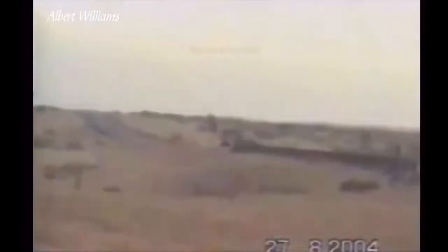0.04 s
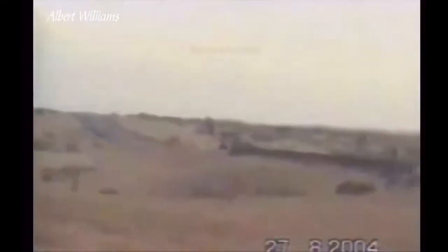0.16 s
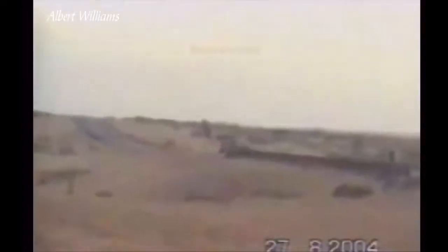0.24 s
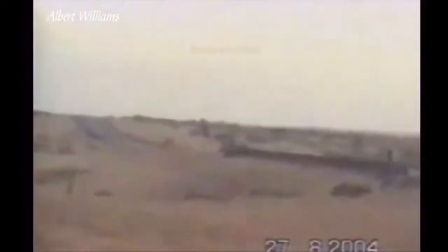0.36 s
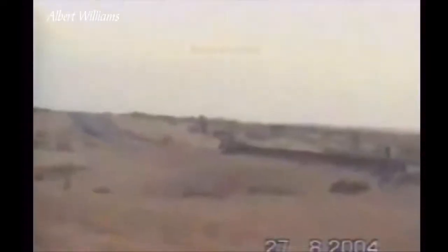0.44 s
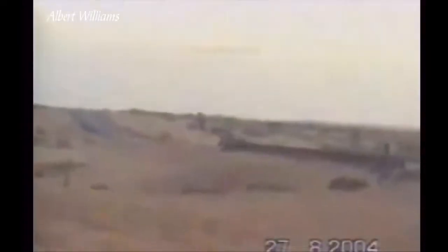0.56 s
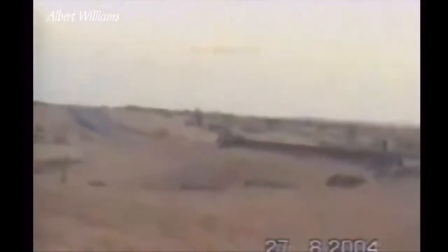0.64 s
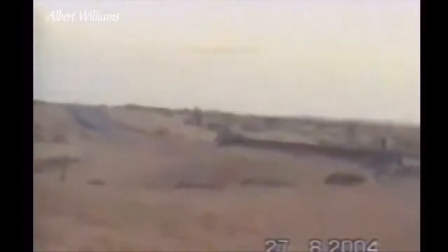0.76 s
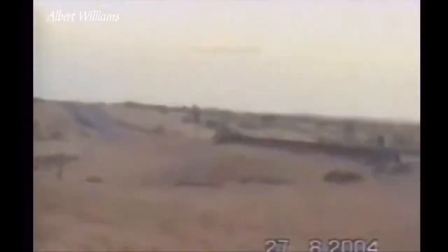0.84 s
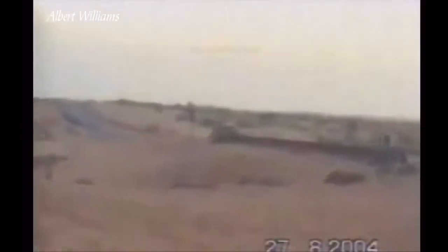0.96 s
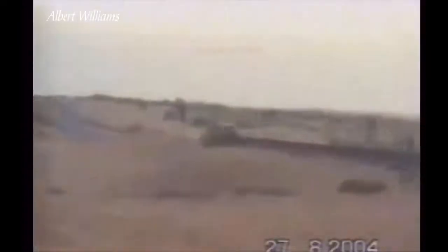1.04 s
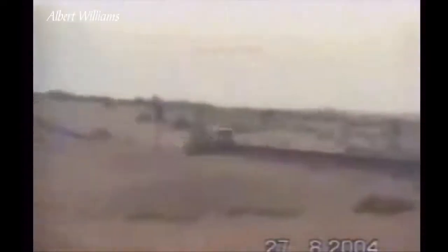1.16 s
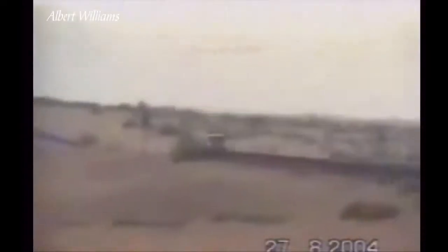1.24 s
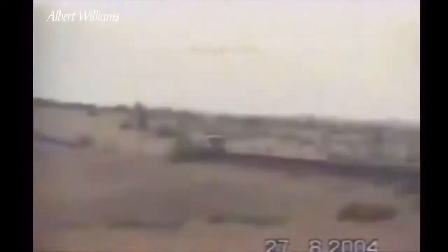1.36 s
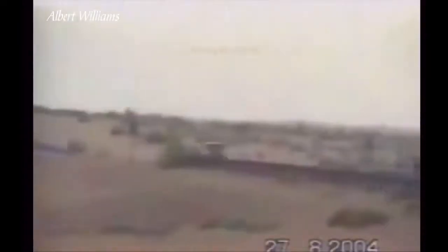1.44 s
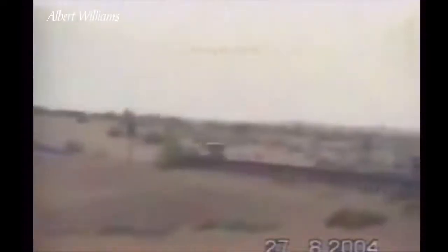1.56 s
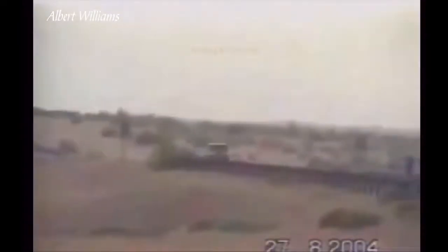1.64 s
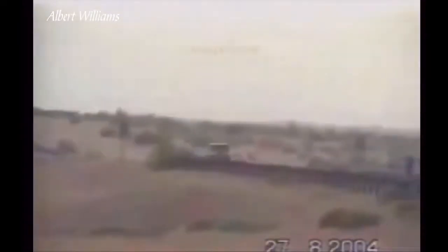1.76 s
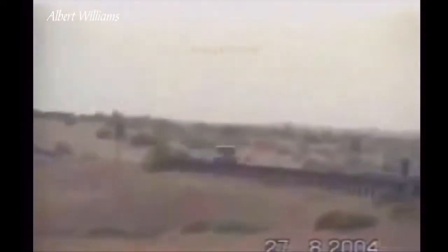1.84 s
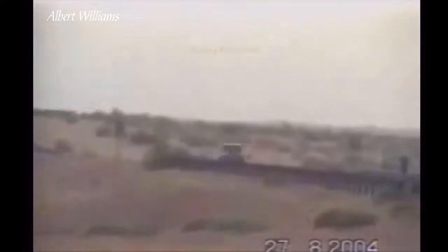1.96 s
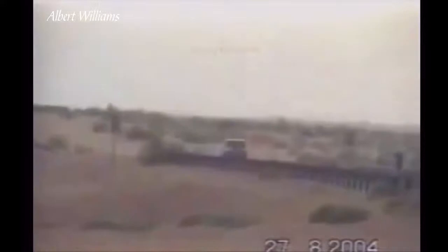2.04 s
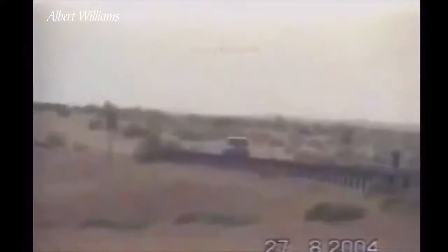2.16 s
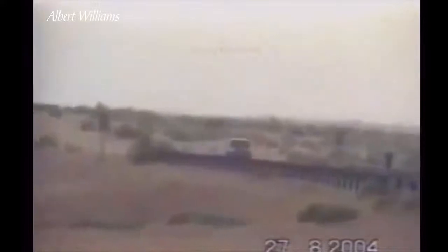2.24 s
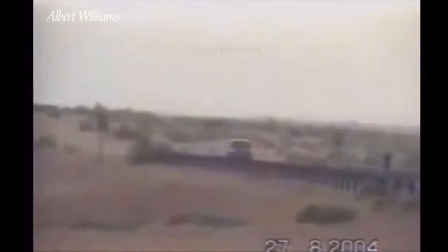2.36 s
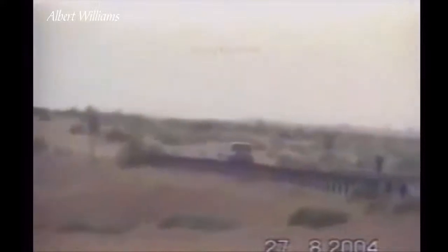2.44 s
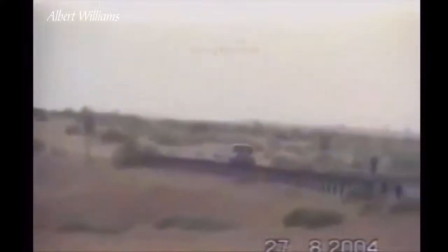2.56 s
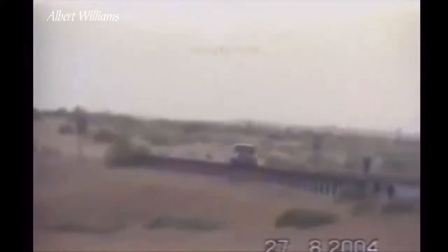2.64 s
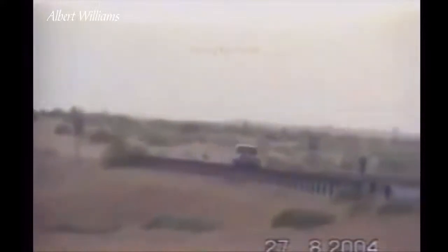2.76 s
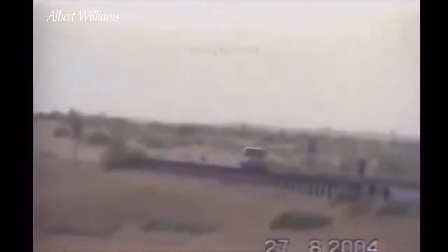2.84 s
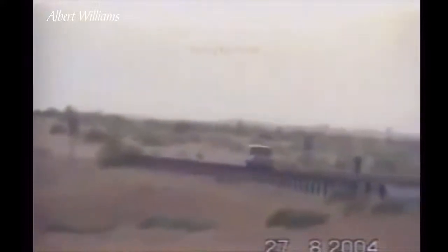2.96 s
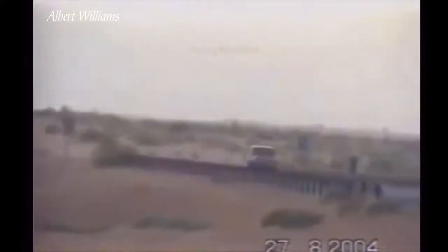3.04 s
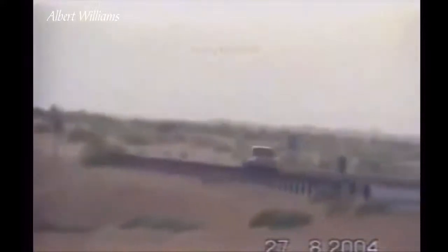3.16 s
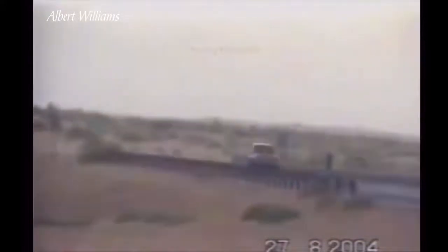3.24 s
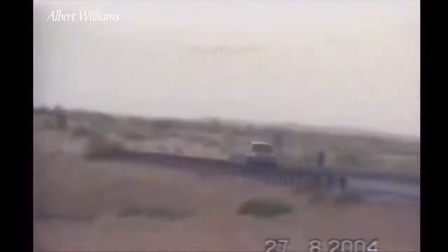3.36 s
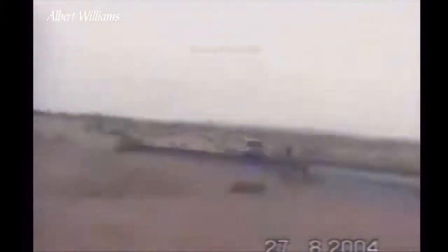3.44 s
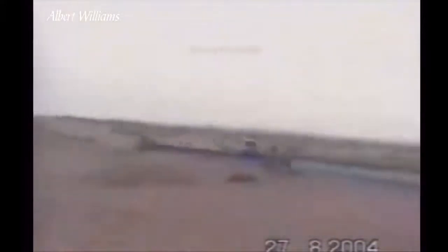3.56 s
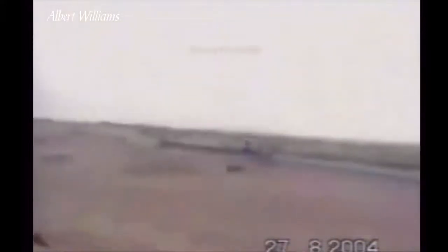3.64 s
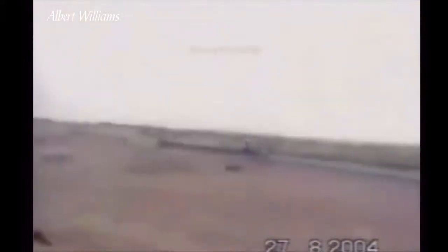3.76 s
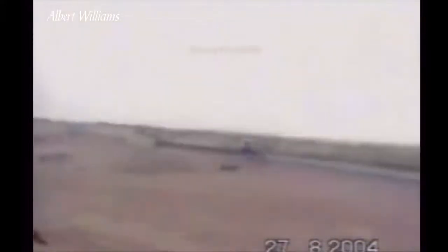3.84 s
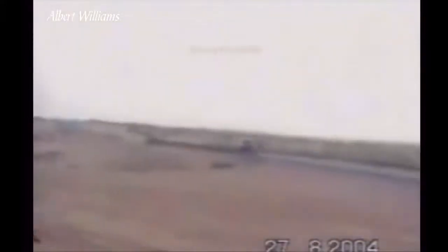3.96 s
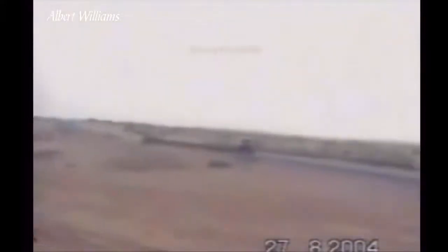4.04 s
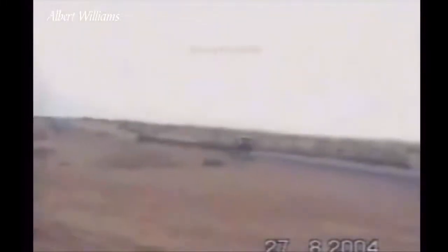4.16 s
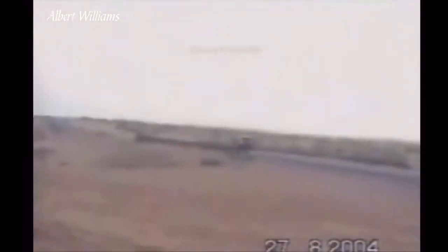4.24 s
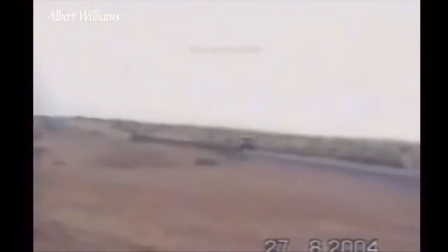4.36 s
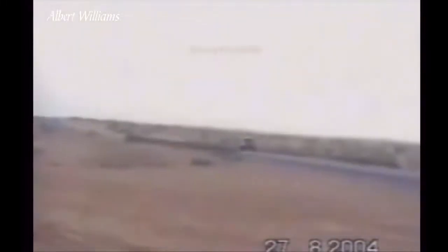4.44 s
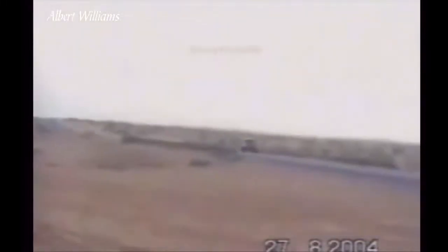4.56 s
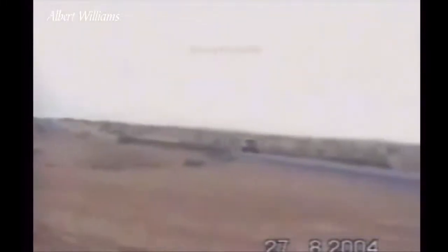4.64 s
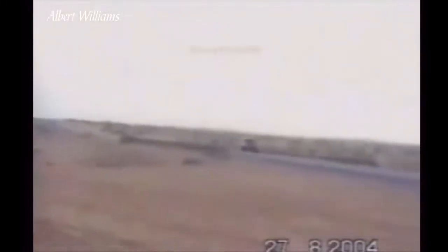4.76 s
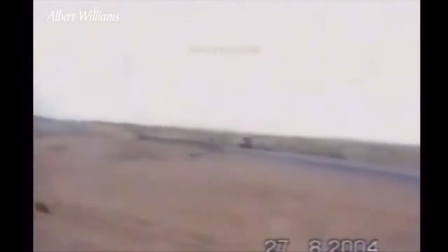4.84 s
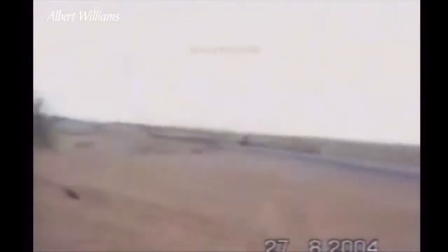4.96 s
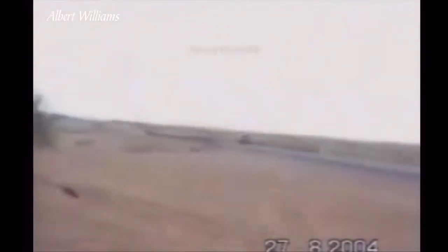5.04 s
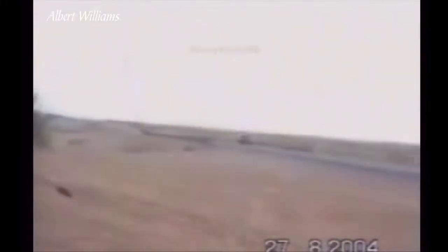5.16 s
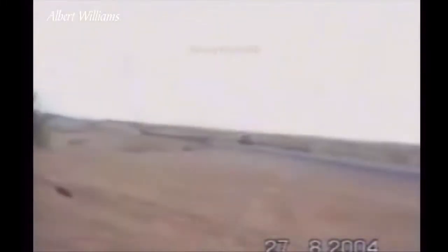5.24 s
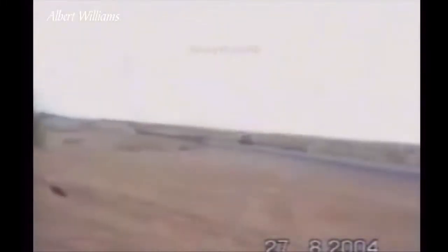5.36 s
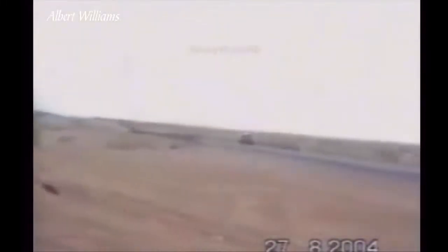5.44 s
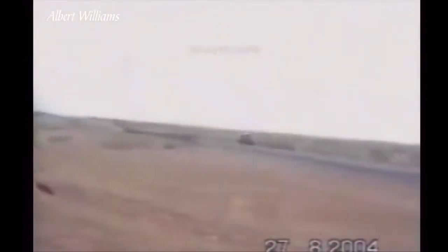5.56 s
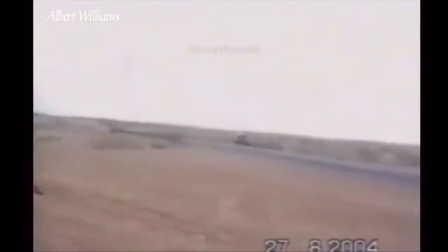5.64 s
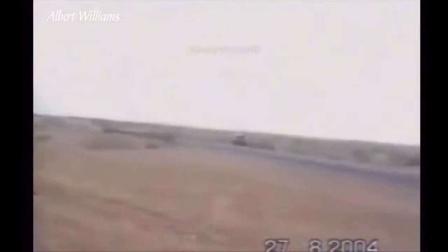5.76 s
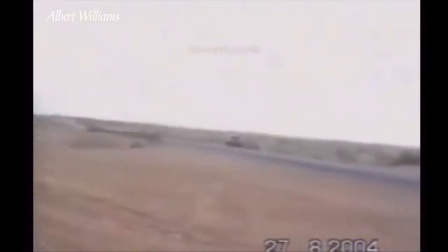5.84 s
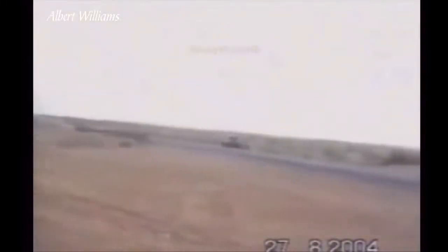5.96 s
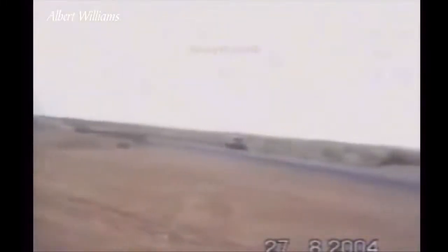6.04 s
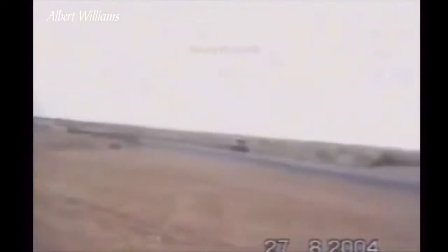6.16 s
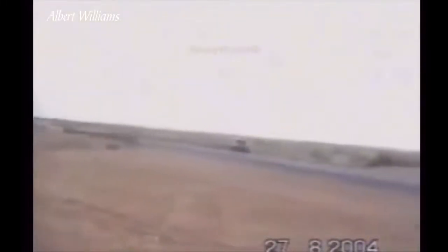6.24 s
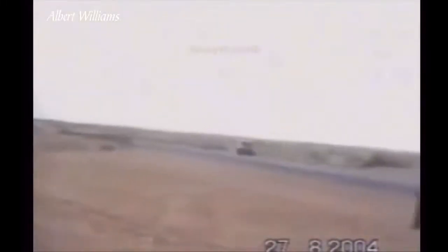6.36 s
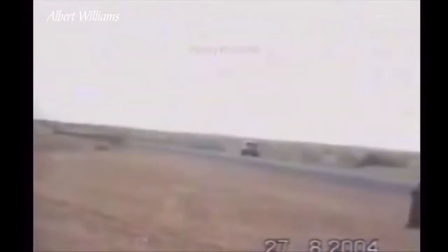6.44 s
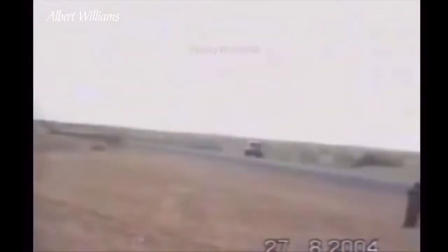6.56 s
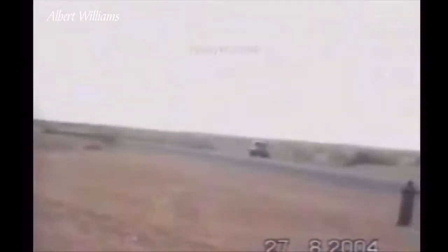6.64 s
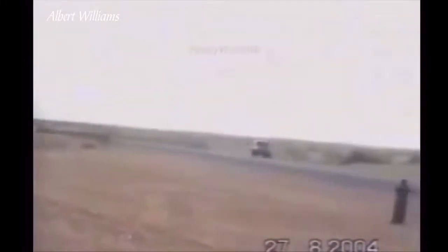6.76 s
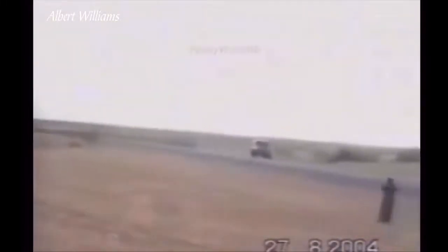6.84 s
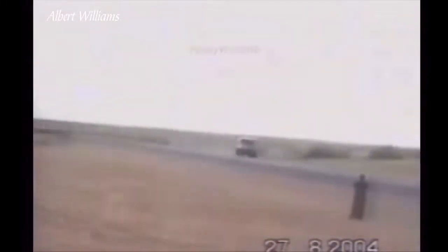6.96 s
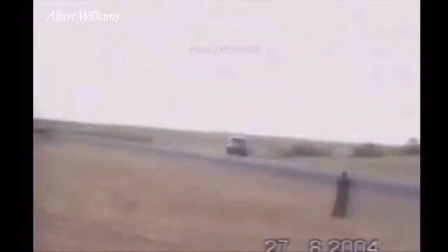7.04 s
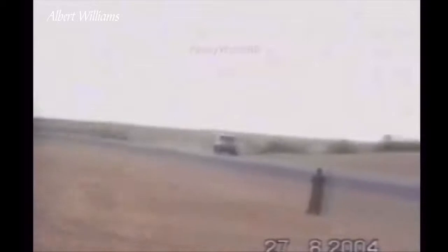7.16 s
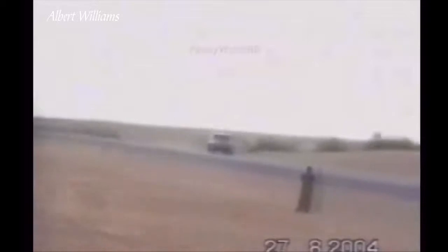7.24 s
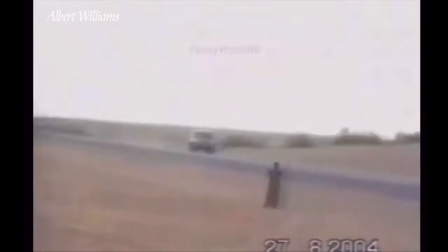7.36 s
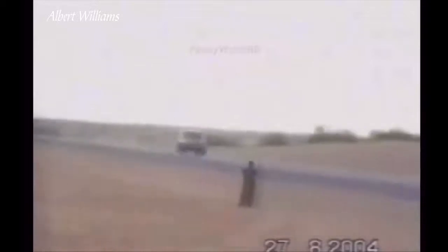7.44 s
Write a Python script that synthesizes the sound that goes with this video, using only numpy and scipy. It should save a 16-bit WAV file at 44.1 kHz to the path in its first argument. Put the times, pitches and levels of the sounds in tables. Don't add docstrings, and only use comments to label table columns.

```python
import sys
import numpy as np
from scipy import signal
from scipy.fft import rfft, irfft, next_fast_len
from scipy.io import wavfile
from scipy.ndimage import uniform_filter1d

SR = 44100
rng = np.random.default_rng(int(sys.argv[2]) if len(sys.argv) > 2 else 0)


def boost(x):
    u = np.asarray(x, float) / 20
    return 10 ** u


def digitize_waveform(pressure):
    field = np.atleast_2d(pressure).T
    bounded = np.clip(field, -1, 1)
    quanta = np.round(bounded * 32767).astype(np.int16)
    wavfile.write(sys.argv[1], SR, quanta)


N = 331191

BANK_HOLD_S, BANK_FADE_DB_PER_S = 0.86, 9


def in_time(rows):
    s, *columns = np.transpose(rows)
    return [np.interp(np.arange(N) / SR, s, c) for c in columns]


def humps(rows, width_s):
    s, *columns = np.transpose(rows)
    bells = np.exp(-((np.arange(N) / SR - s[:, None]) / width_s) ** 2 / 2)
    return [c @ bells for c in columns]


def rms_one(x):
    return x / np.sqrt(np.mean(x ** 2) + 1e-20)


def drift(rate):
    pole = np.exp(-80 * np.pi * rate / SR)
    noise = rng.standard_normal(N // 40 + 2002)
    slow = signal.lfilter([1], [1, -2 * pole, pole * pole], noise)[2000:]
    return np.interp(np.arange(N) / 40, np.arange(len(slow)), rms_one(slow))


def coloured(spectrum, patchy_db, rate, count):
    size = next_fast_len(N)
    log_hz = np.log(np.maximum(np.arange(size // 2 + 1) * SR / size, 1))
    hz, level_db = np.transpose(spectrum)
    at = np.log(hz)
    colour = boost(np.interp(log_hz, at, level_db, left=-200, right=-200))
    noise = rfft(rng.standard_normal(size)) * colour
    place = (log_hz - at[0]) / (at[-1] - at[0]) * (count - 1)
    total = np.zeros(N)
    for k in range(count):
        share = np.clip(1 - abs(place - k), 0, 1)
        total += irfft(noise * share, size)[:N] * boost(patchy_db * drift(rate))
    return rms_one(total)


# t/s, nearness level/dB, open sight of the tyres level/dB; 0 dB = close, full view
CAR_APPROACH = [(0, -19, -9.5), (1.1, -19.5, -13.5), (2.4, -15.5, -13.5), (3.2, -11, -12), (3.7, -7, -11),
                (4.3, -8, -7.5), (4.9, -5.5, -5), (5.4, -4, -2), (5.8, -3, -2.5), (6.2, -3.5, 0),
                (6.5, -4, -2), (6.9, 0.5, 0), (7.2, -1, -2), (7.51, 1.5, -1.5)]


def approach():
    return in_time(CAR_APPROACH)


# f/Hz, level/dB (per Hz)
TAPE_COLOUR = [(2250, -15), (2800, -2.5), (3000, -3), (3400, -5), (4500, -1), (6500, 1), (9000, -0.5),
               (10300, -7.5), (11150, 3.5), (12500, 1)]


def tape_hiss():
    return boost(-78) * coloured(TAPE_COLOUR, patchy_db=1.7, rate=11, count=2)


# t/s, centre f/Hz, level/dB
HIGH_PUFFS = [(5.8, 14700, -93), (6.015, 14750, -90), (6.148, 14750, -90), (6.177, 14100, -92),
              (6.225, 14750, -93), (6.638, 14750, -89), (6.78, 14300, -87), (6.79, 12750, -90),
              (6.874, 14750, -90), (7.08, 14100, -96), (7.1, 14750, -92), (7.354, 14750, -92),
              (7.45, 12750, -94)]


def high_puffs(width_hz=600, puff_s=0.01, lift_db=3):
    out, t = np.zeros(N + 4000), np.arange(-2000, 2000) / SR
    for s, hz, db in HIGH_PUFFS:
        edges = [hz - width_hz / 2, hz + width_hz / 2]
        band_pass = signal.butter(4, edges, "band", fs=SR, output="sos")
        band = rms_one(signal.sosfilt(band_pass, rng.standard_normal(4000)))
        bell = np.exp(-(t / puff_s) ** 2 / 2)
        middle = round(s * SR)
        out[middle - 2000:middle + 2000] += boost(db + lift_db) * bell * band
    return out[:N]


# f/Hz, level/dB (per Hz)
BANK_TREBLE = [(2250, 2), (2400, 3), (2700, -0.5), (2900, -5), (3000, -20)]


def far_bank():
    level_db = -81 - 6 * np.maximum(np.arange(N) / SR - 2.6, 0)
    return boost(level_db) * coloured(BANK_TREBLE, patchy_db=4.0, rate=4.9, count=2)


# f/Hz, level/dB (per Hz)
WIND_COLOUR = [(15, -6.5), (40, -8), (90, -1.5), (200, 2.5), (350, -16), (450, -17)]


def wind(mid_db=-57.5, rise_db_per_s=0.37):
    level_db = mid_db + rise_db_per_s * (np.arange(N) - N / 2) / SR
    return boost(level_db) * coloured(WIND_COLOUR, patchy_db=1.8, rate=3, count=3)


# t/s, peak level/dB, low f/Hz, top f/Hz, t60/s
HAND_KNOCKS = [(.279, -63, 2300, 3800, 0.03), (.281, -49, 900, 2380, 0.018), (.62, -51, 300, 383, 0.24),
               (1.12, -52, 394, 476, 0.15), (1.3, -53, 408, 500, 0.37), (1.394, -48, 1200, 2270, 0.034),
               (1.43, -43.5, 70, 318, 0.16), (1.87, -54, 285, 365, .3), (2.19, -69, 2200, 2940, 0.074),
               (3.294, -61, 1700, 2930, 0.091), (4.756, -51, 1320, 2300, .03),
               (4.8, -50, 1198, 2332, 0.031)]


def knocks():
    out, t = np.zeros(N + 12000), np.arange(12000) / SR
    for s, db, low_hz, top_hz, t60 in HAND_KNOCKS:
        band_pass = signal.butter(3, [low_hz, top_hz], "band", fs=SR, output="sos")
        band = rms_one(signal.sosfilt(band_pass, rng.standard_normal(12000)))
        envelope = boost(db - 60 * t / t60) * (1 - np.exp(-20 * t / t60))
        start = round(s * SR)
        out[start:start + 12000] += envelope * band
    return out[:N]


# t/s, peak level/dB, ring f/Hz, t60/s, snap top f/Hz
BODY_TICKS = [(.067, -35.5, 856, 0.039, 1500), (0.282, -39, 590, 0.048, 2930),
              (1.396, -33, 1720, 0.014, 2200), (1.397, -55, 5740, 0.013, 5770),
              (1.402, -29, 500, 0.007, 1500), (3.289, -34, 1470, 0.014, 1790),
              (4.757, -33, 1490, 0.022, 2000), (4.801, -33, 1680, 0.02, 2300), (4.97, -72, 2810, .04, 1200),
              (5.05, -72, 2870, 0.034, 1200), (6.104, -27.5, 912, 0.022, 2000),
              (6.1045, -34, 327, 0.026, 1000)]


def camera_ticks(rise_s=0.001, snap_db=-49):
    out, t = np.zeros(N + 4000), np.arange(4000) / SR
    for s, db, hz, t60, top_hz in BODY_TICKS:
        dull = signal.butter(10, top_hz, fs=SR, output="sos")
        snap = boost(snap_db) * signal.sosfilt(dull, rng.standard_normal(4000))
        ring = boost(db) * np.sin(2 * np.pi * hz * t)
        envelope = boost(-60 * t / t60) * (1 - np.exp(-t / rise_s))
        start = round(s * SR)
        out[start:start + 4000] += envelope * (ring + snap)
    return out[:N]


# t/s, first cancelled f/Hz, strength (0-1)
SAND_ECHO = [(0, 470, 0.56), (2, 416, 0.4), (4.2, 466.8, 0.61), (5.5, 465, 0.5), (6.4, 441, 0.4),
             (7.51, 431.8, 0.35)]


def ground(x):
    notch_hz, strength = in_time(SAND_ECHO)
    late = np.interp(np.arange(N) - SR / notch_hz / 2, np.arange(N), x)
    return x + np.clip(strength, 0, 1) * late


# t/s, centre f/Hz
HORN_CENTRE = [(0, 772), (.6, 801), (1, 1056), (1.5, 763), (2.5, 752), (3.5, 1050), (4.2, 1013),
               (4.8, 858.4), (5.35, 820.4), (5.7, 1013), (6.15, 937.6), (6.7, 866), (7.51, 836.4)]
# t/s, level/dB
HORN_SWINGS = [
    (2.55, -23),
    (7.1, 3.5),
]


def horn(width_hz=130):
    centre_hz, = in_time(HORN_CENTRE)
    share_db = -4.5 + 0.4 * approach()[0] + humps(HORN_SWINGS, 0.36)[0]
    low = signal.butter(2, width_hz / 2, fs=SR, output="sos")
    a, b = signal.sosfilt(low, rng.standard_normal((2, N)))
    turn = 2 * np.pi * np.cumsum(centre_hz) / SR
    return boost(share_db) * rms_one(a * np.cos(turn) + b * np.sin(turn))


# f/Hz, level/dB (per Hz)
RUMBLE_COLOUR = [(25, -34), (50, -37), (100, -12), (170, -5), (240, 1), (320, -2), (420, -11.5), (520, -23)]
ROAR_COLOUR = [(380, -16), (470, -9), (540, -7), (600, -6.5), (820, -6.5), (1100, -4.5), (1280, -7),
               (1450, -29)]
TREAD_COLOUR = [(1150, -38), (1330, 0), (1560, 3.5), (1730, -2.5), (1850, -8), (2050, -2.5), (2250, -8),
                (2520, -24.5), (2800, -61)]
AIR_COLOUR = [(2500, 2.5), (3000, -1), (3500, 2.5), (4200, -3), (4800, -8), (5200, -7), (6900, -6),
              (7900, -14.5), (8700, -7.5), (9450, -10.5), (9600, -9.5), (10050, -2.5), (11150, 0.5),
              (12500, -4)]
# t/s, rumble level/dB, roar level/dB
ROAD_BUMPS = [(.21, 4, 1.5), (.92, 2, 4.5), (3.49, 3, -3), (4.16, 2, 4), (4.39, 5, 0), (4.7, 4.5, 2.5),
              (4.83, 2.5, 2), (5.46, 3.5, -0.5), (5.63, 1.5, 2.5), (6.04, 3.5, 1.5), (7.04, 4, 0.5),
              (7.43, 0.5, 1.5)]


def road():
    near_db, sight_db = approach()
    jolt_db, slap_db = humps(ROAD_BUMPS, 0.021)
    bank_db, = humps([(BANK_HOLD_S, 6.5)], 1)
    roar_db = -46.5 + 0.31 * near_db + 0.55 * sight_db + bank_db + slap_db
    rumble = boost(-42 + near_db + jolt_db) * coloured(RUMBLE_COLOUR, patchy_db=0.0, rate=4.3, count=6)
    roar = boost(roar_db) * (coloured(ROAR_COLOUR, patchy_db=1.22, rate=6.0, count=5) + horn())
    tread = boost(-49 + sight_db) * coloured(TREAD_COLOUR, patchy_db=1.43, rate=16.6, count=4)
    air = boost(-66 + sight_db) * coloured(AIR_COLOUR, patchy_db=0.25, rate=12, count=5)
    return ground(rumble + roar) + tread + air


# t/s, f/Hz
FIRING_RATE = [(0, 245.8), (.9, 248.5), (1.9, 251.2), (3.1, 254.4), (3.7, 256.1), (5.3, 256), (5.9, 254.5),
               (6.7, 250), (7.1, 246.5), (7.51, 241)]
# t/s, level/dB
PIPE_SWELLS = [
    (2.6, 0.5),
    (3.6, 4.5),
    (4.0, 1.5),
    (4.4, -3),
    (4.8, -2),
    (5.3, -2.5),
    (5.9, -10),
    (6.7, 6),
    (7.1, -3),
    (7.51, 9.5),
]
# multiple of engine cycle, level/dB by the bank, on the bridge, on open road
UNEVEN_LINES = [(2, -68, -67, -68), (4, -68, -64, -61), (5, -69, -65, -63), (14, -66, -64, -74),
                (15, -70, -64, -80), (16, -68, -64, -70), (24, -78, -71, -66), (30, -78, -75, -79),
                (20, -58, -66, -74), (22, -75, -77, -78), (23, -63, -66, -72), (26, -72, -79, -80)]
STAGE_TIMES = [.3, 1.8, 3.6]


def engine():
    t = np.arange(N) / SR
    screen_db = -30 * np.maximum(t - 3.9, 0)
    cycle = 2 * np.pi * np.cumsum(in_time(FIRING_RATE)[0]) / SR / 6
    cycle += 0.011 * drift(1.5)
    firing_db = -52.5 + humps(PIPE_SWELLS, 0.11)[0]
    bridge_s = 2.7
    octave_db = -54.5 - np.maximum(7 * (bridge_s - t), 16 * (t - bridge_s))
    octave_db = np.clip(octave_db, -68, -58.5)
    twelfth_db = np.clip(-55 - BANK_FADE_DB_PER_S * (t - BANK_HOLD_S), -74, -55)
    flutter_db = np.interp(t, [3.2, 4.3], [0.75, 3.7])
    lines = []
    for k, db in [(6, firing_db), (12, octave_db + screen_db), (18, twelfth_db + screen_db)]:
        lines.append((k, db + flutter_db * drift(12.0)))
    for k, *stage_db in UNEVEN_LINES:
        db = np.interp(t, STAGE_TIMES, stage_db) + screen_db * (k > 6)
        lines.append((k, db + 1.5 * drift(2.5)))
    tone = np.zeros(N)
    for k, db in lines:
        tone += boost(db) * np.sin(round(k) * cycle + 2 * np.pi * rng.random())
    return np.sqrt(2) * tone


def scene():
    return (far_bank() + wind() + knocks() + camera_ticks() + road() + engine())[None]


# f/Hz, level/dB
THRESHOLD_COLOUR = [(2350, 12.5), (2700, 11.5), (3050, 8.5), (3300, 9), (5000, 2), (6500, 3), (8000, -1.5),
                    (9100, 1.5), (9450, -8), (9600, 3), (9850, 2), (10300, 6), (11150, 7), (12500, -1)]
# f/Hz, level/dB
TOP_EDGE = [(11190, 0), (11220, -10), (11990, -12), (12030, -19), (12400, -19), (12420, -60)]
# t/s, level/dB
THRESHOLD_DIPS = [
    (4.97, -5),
    (5.06, -6),
    (6.34, -1),
    (6.47, -4),
    (7.12, -3.5),
]


def thinned_treble(x, depth_db=-28):
    hz, s, cells = signal.stft(x, SR, nperseg=2048)
    power = uniform_filter1d(abs(cells) ** 2, size=3, axis=0)
    power = uniform_filter1d(power, size=6, axis=1)
    near_db, sight_db = approach()
    step_db = -103.8 + 0.71 * sight_db + humps(THRESHOLD_DIPS, 0.009)[0]
    step_db = np.interp(s * SR, np.arange(N), step_db) + 4.2 * (s > 5.0)
    step_db = step_db + np.interp(hz, *np.transpose(THRESHOLD_COLOUR), left=-99)[:, None]
    step_db = step_db + 0.58 * np.outer(hz < 2500, np.interp(s * SR, np.arange(N), near_db))
    margin_db = 10 * np.log10(power + 1e-20) - step_db
    kept = 1 / (1 + np.exp(np.clip(-margin_db / 0.3, -50, 50)))
    kept = np.maximum(kept, boost(depth_db))
    top = boost(np.interp(hz, *np.transpose(TOP_EDGE)))[:, None]
    return signal.istft(cells * kept * top, SR, nperseg=2048)[1][:N]


def low_pass(x):
    return signal.sosfilt(signal.butter(12, 15100, fs=SR, output="sos"), x)


def record(dry):
    taped = thinned_treble(dry[0] + tape_hiss())
    mix = (taped + high_puffs())[None] + 0.001
    return low_pass(mix)


dry = scene()
out = record(dry)
digitize_waveform(out)
```